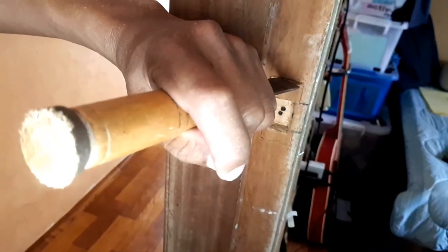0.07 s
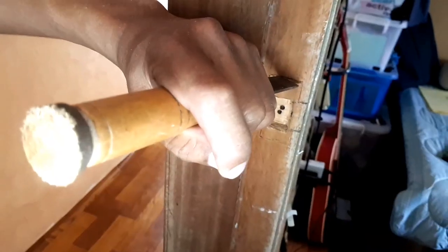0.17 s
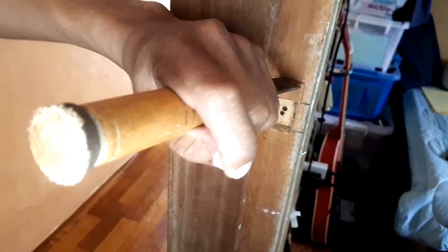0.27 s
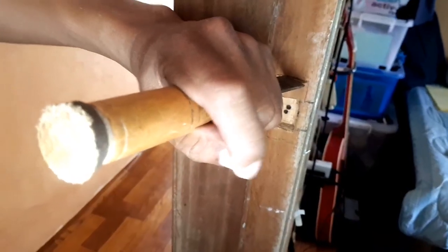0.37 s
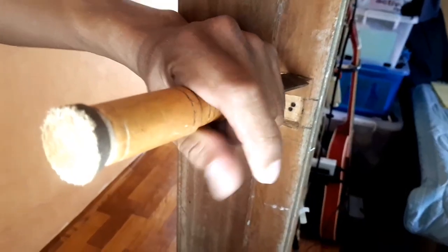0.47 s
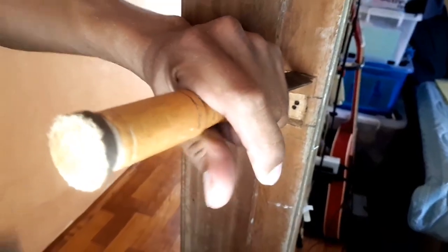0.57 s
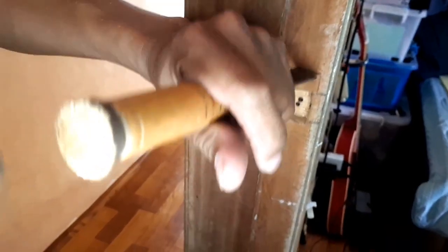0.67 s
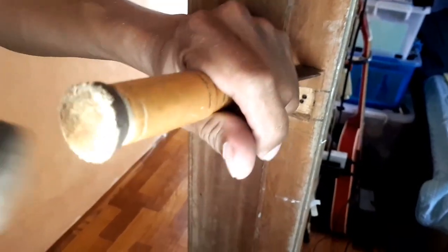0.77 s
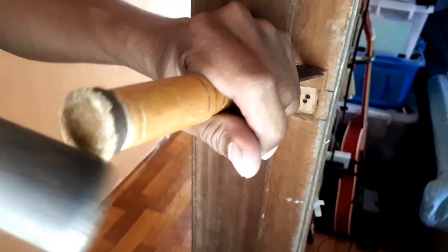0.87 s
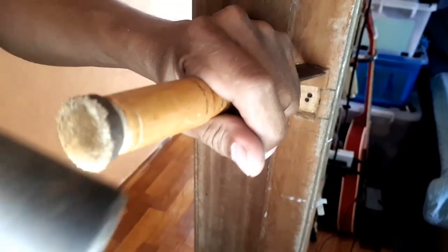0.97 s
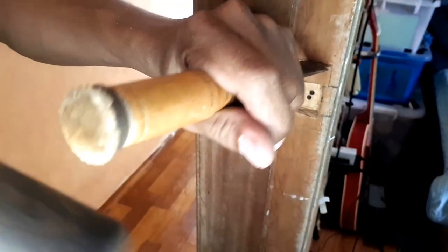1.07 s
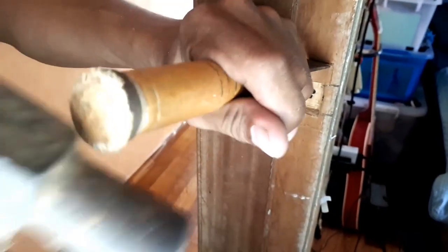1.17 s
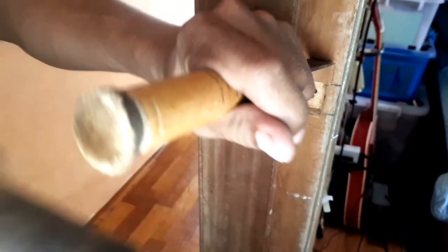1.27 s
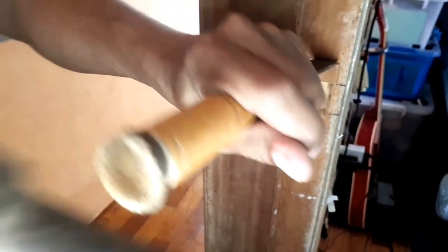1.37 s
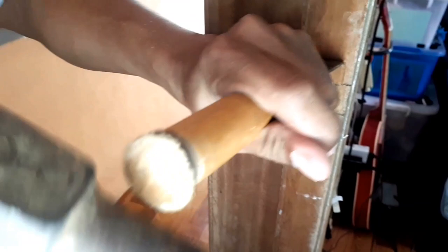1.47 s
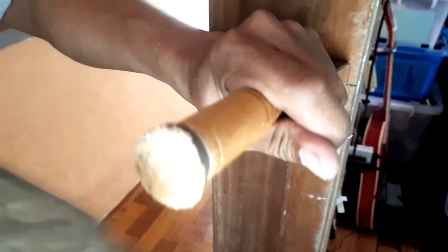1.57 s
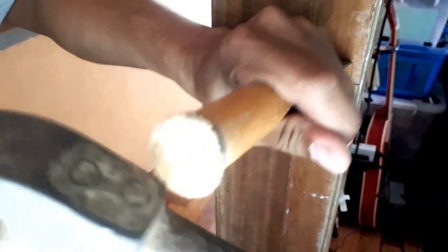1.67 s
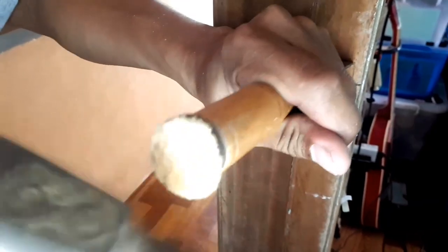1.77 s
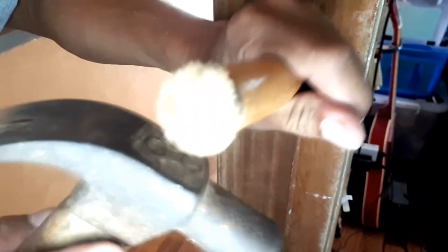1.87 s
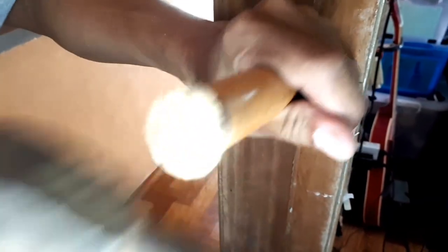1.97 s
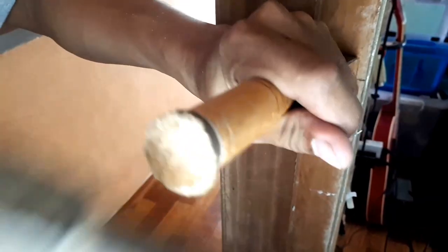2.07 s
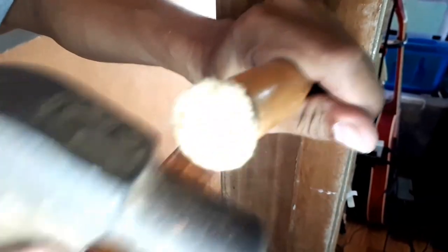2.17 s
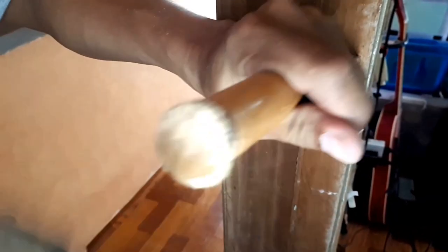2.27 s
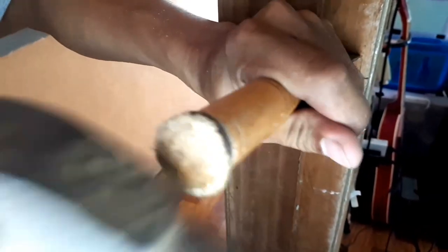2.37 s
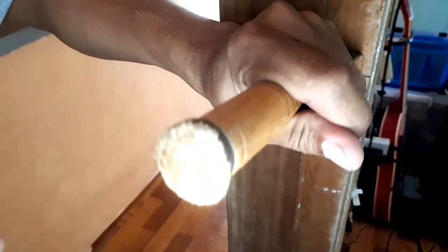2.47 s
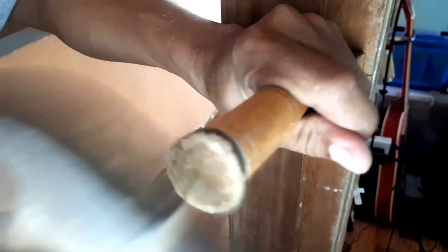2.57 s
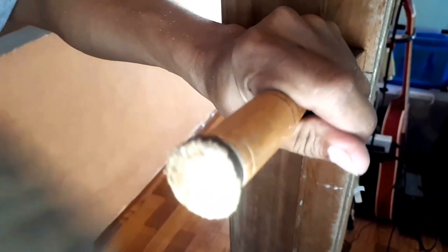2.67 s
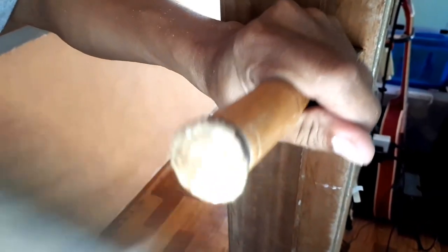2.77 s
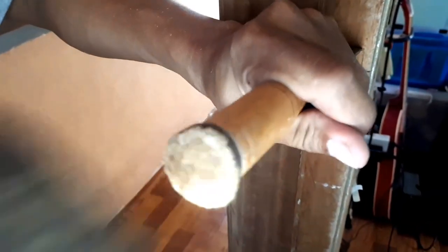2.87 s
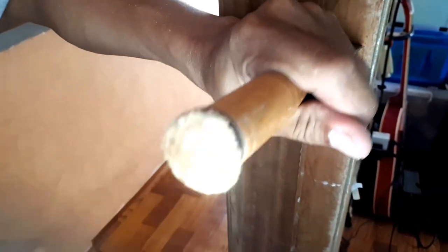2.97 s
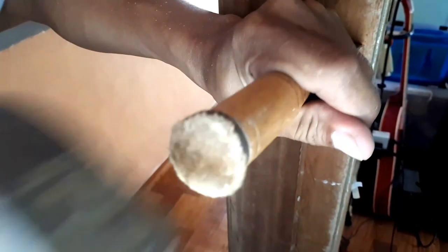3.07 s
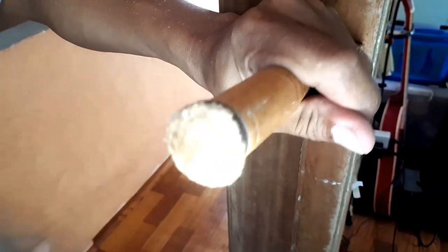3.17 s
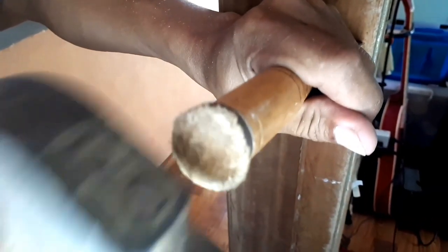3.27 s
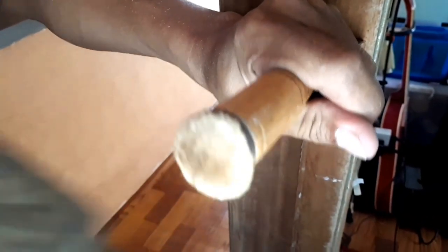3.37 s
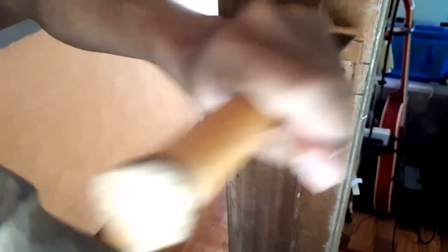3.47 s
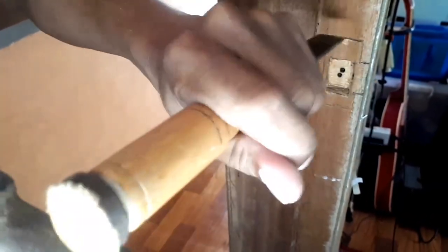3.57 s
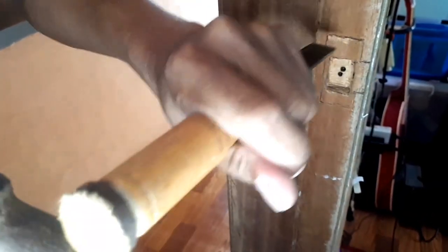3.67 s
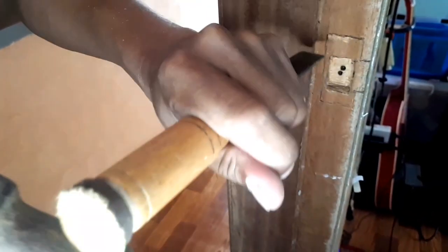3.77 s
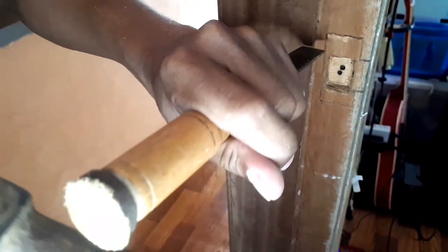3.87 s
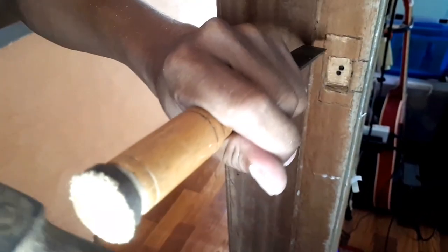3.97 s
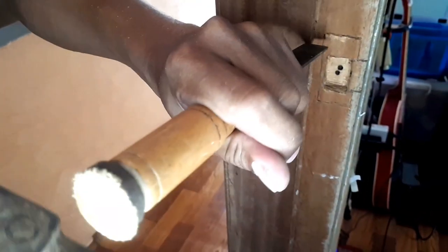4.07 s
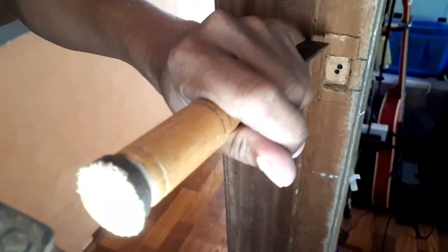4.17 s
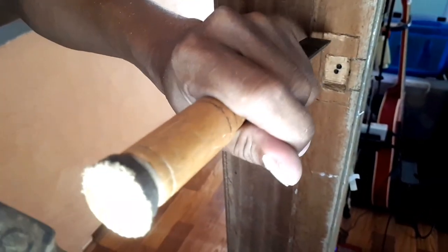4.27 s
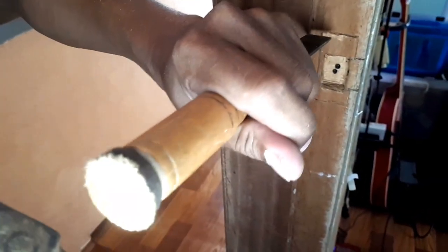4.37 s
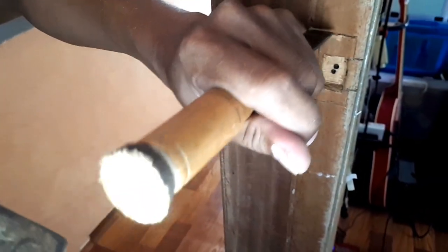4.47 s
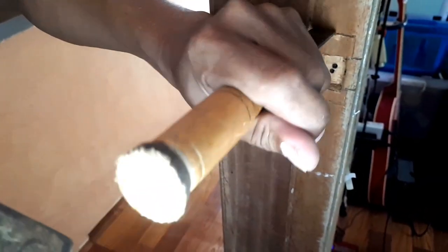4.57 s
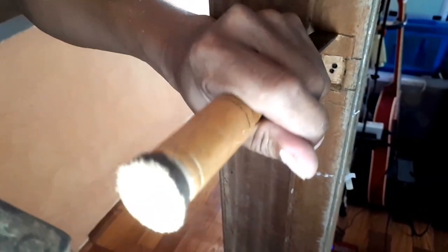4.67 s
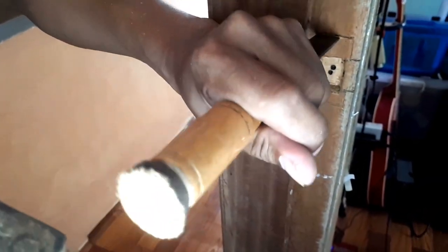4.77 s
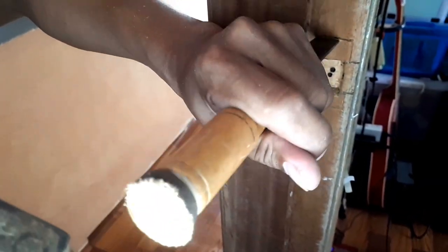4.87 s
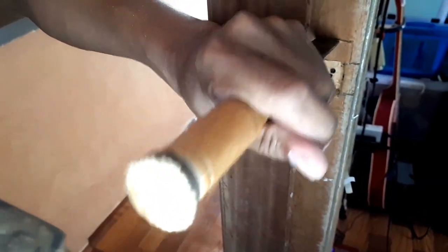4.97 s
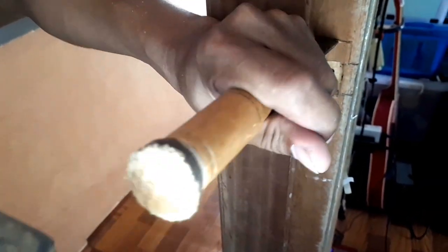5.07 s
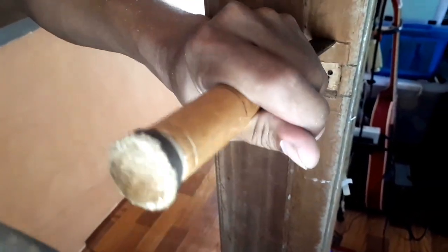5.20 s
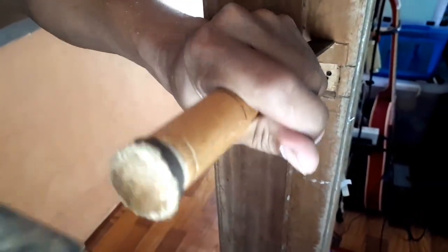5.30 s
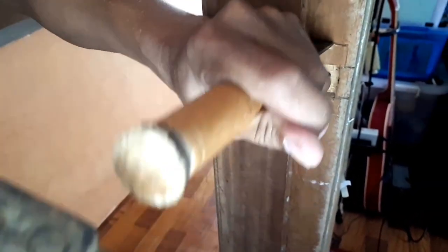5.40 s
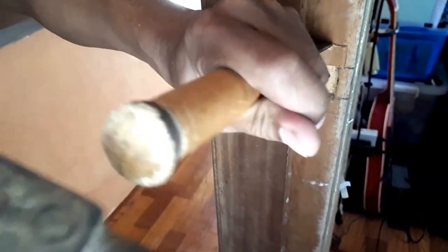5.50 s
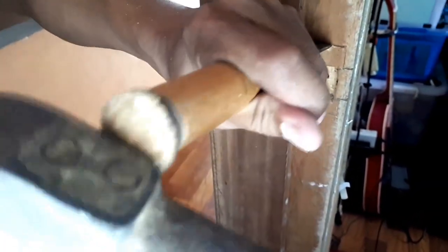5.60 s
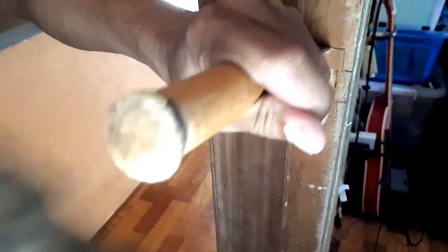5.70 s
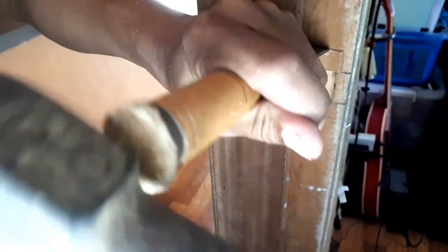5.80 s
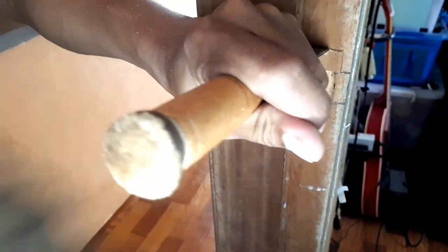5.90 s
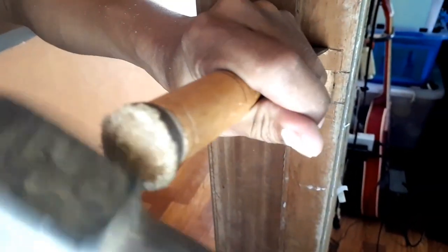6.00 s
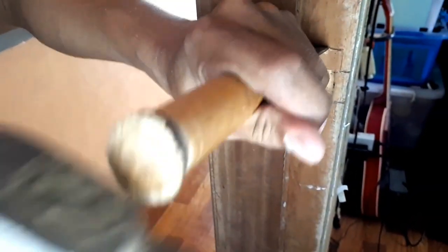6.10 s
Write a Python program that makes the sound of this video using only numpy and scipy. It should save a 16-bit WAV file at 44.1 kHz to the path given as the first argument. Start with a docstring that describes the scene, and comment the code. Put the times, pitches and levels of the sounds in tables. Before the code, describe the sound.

Close to a stereo microphone in a small room, a steel hammer hits a wood-handled chisel set in a door jamb. Nine blows begin dull and boomy, then turn hard and bright. A pause of over two seconds holds only slight rubs and touches while the faint engine and traffic background sinks and returns. Three final blows go from thuddy to sharp.

```python
"""Engines drone and tyres hiss outside; then a steel hammer drives a wood-handled chisel into a door jamb,
close to the microphone in a small room. Dull blows sink the edge in and boom the jamb; hard ones land on
seated wood and crack brightly. In the pause the background sinks away and returns, and the tools rub and
touch the wood; three more blows end it. Each blow is a contact pulse convolved with the response of chisel,
jamb and room; engines are sums of harmonics, traffic and rubs are shaped noise."""
import sys
import numpy as np
from scipy import signal
from scipy.fft import rfft, irfft
from scipy.io import wavfile
from scipy.ndimage import uniform_filter1d, minimum_filter1d

SR = 44100
rng = np.random.default_rng(int(sys.argv[2]) if len(sys.argv) > 2 else 0)


def file_out(sig):
    """Save sig as 16-bit WAV at sys.argv[1]."""
    # one column per channel
    cols = np.atleast_2d(sig).T
    # limit, then scale
    lim = np.clip(cols, -1, 1)
    pcm = np.round(lim * 32767).astype(np.int16)
    wavfile.write(sys.argv[1], SR, pcm)


N = 270774

# spectrum of a faint even hiss, also the raw noise for rubs and whines: frequency_hz, level_db
HISS_SPECTRUM = [(100, -3.5), (3000, -2.5), (7700, -0.5), (8300, -4), (15500, -1.5)]


def amp(db):
    """Decibels to amplitude ratio: 20 dB is a factor of ten."""
    return 10 ** (np.asarray(db) / 20)


def unit(x):
    """Normalises a signal to a root-mean-square value of 1."""
    return x / np.sqrt(np.mean(x ** 2) + 1e-20)


def read(points, hz):
    """Interpolates a spectrum by straight lines on a log-frequency axis."""
    f, value = np.transpose(points)
    return np.interp(np.log(hz + 1), np.log(f + 1), value)


def add(mix, s, sound):
    """Superposition: mixes a sound in at time s, cut off at the end of the mix."""
    part = mix[:, max(round(s * SR), 0):][:, :sound.shape[-1]]
    part += sound[..., :part.shape[1]]


def click(points, size=4096):
    """Minimum phase: the most compact causal pulse with the given spectrum."""
    hz = abs(np.fft.fftfreq(size, 1 / SR))
    log_gain = np.log(amp(read(points, hz)))
    # the Hilbert transform of the log gain gives the phase
    spectrum = np.exp(np.conj(signal.hilbert(log_gain)))
    return np.fft.ifft(spectrum).real[:size // 2]


def noise(points, size):
    """Interaural coherence: coloured noise, alike at both ears in the bass, unrelated in the treble."""
    # likeness of the two ears: frequency_hz, coherence (0 to 1)
    coherence = [(50, 1), (300, 0.87), (600, .7), (1100, 0.01), (2200, .05), (8000, 0)]
    hz = np.fft.rfftfreq(size, 1 / SR)
    left, other = rfft(rng.standard_normal((2, size)))
    same = read(coherence, hz)
    right = same * left + np.sqrt(1 - same ** 2) * other
    return irfft(np.array([left, right]) * amp(read(points, hz)), size)


def wander(rate_hz):
    """Low-passed noise: a slow random fluctuation with a root-mean-square value of 1."""
    hz = np.fft.rfftfreq(N, 1 / SR)
    spectrum = rfft(rng.standard_normal(N)) / (1 + (hz / rate_hz) ** 4)
    return unit(irfft(spectrum, N))


def low_cut(x, corner_hz):
    """Second-order high-pass: as with a small source, little deep bass remains."""
    return signal.sosfilt(signal.butter(2, corner_hz, "high", fs=SR, output="sos"), x)


def swells(rows):
    """Band-limited noise: each band swells and fades once along half a sine."""
    out = np.zeros((2, N))
    for start, end, hz, width, db in rows:
        swell = np.sin(np.linspace(0, np.pi, round((end - start) * SR)))
        edges_hz = [max(hz - width / 2, 20), hz + width / 2]
        band = signal.butter(2, edges_hz, "band", fs=SR, output="sos")
        sound = signal.sosfilt(band, noise(HISS_SPECTRUM, len(swell))) * swell
        add(out, start, amp(db) * unit(sound))
    return out


def lull_db(late_s=0):
    """Level envelope in decibels: the background sinks steadily, stays low, then comes back quickly."""
    start_s, fall_s, end_s, rise_s, depth_db = 2.7, 0.81, 4.38, 0.25, -16.5
    t = np.arange(N) / SR
    sinking = (t - start_s - late_s) / fall_s
    returning = 1 - (t - end_s) / rise_s
    return depth_db * np.clip(np.minimum(sinking, returning), 0, 1)


def street(tyre_lull=1.15, tyre_late_s=0.45, hiss_lull=0.76):
    """Spreading loss: tyre noise falls with distance from each pass, over steady rumble and a faint hiss."""
    # traffic rumble through the walls: frequency_hz, level_db
    rumble_spectrum = [(25, -18), (60, -19.5), (90, -10.5), (150, -3), (250, -6.5), (400, -14.5),
                       (800, -21), (1300, -33), (2500, -49.5), (6000, -71)]
    # hiss of tyres: frequency_hz, level_db
    tyre_spectrum = [(200, -28.5), (800, 1), (1500, -5), (2800, -10), (4200, -21), (7500, -25.5),
                     (9000, -40), (16000, -49)]
    # vehicles passing outside: nearest_s, tyre_level_db, time to cover its own distance from the room span_s
    passes = [(0.218, -50.5, 0.28), (2.0, -55, 0.51), (5.72, -53.5, 0.083)]
    t = np.arange(N) / SR
    swell_db = .5 * wander(10)
    # amplitude is inverse to distance; the powers of the vehicles add
    nearness = np.sqrt(sum(amp(db) ** 2 / (1 + ((t - s) / span_s) ** 2) for s, db, span_s in passes))
    rumble = amp(-44.5 + lull_db() + swell_db) * unit(noise(rumble_spectrum, N))
    tyre_gain = nearness * amp(tyre_lull * lull_db(tyre_late_s) + swell_db)
    tyres = tyre_gain * unit(noise(tyre_spectrum, N))
    hiss = amp(-69 + hiss_lull * lull_db()) * unit(noise(HISS_SPECTRUM, N))
    return rumble + tyres + hiss


def engines(waver=.006, flutter_db=-0.3, throb=0.31, lull_share=.9, count=5):
    """Harmonics and resonance: engines idle, then speed up, their low orders swelling at the room modes."""
    # engines outside: start_s, end_s, firing rate at idle_hz, speed-up from pull_s, gain in hz_per_s, level_db
    engine_runs = [(-.3, 2.66, 50.73, 1.2, 4.1, -2), (3.6, 5.6, 35.58, 4.2, 3.7, 0.5)]
    # low resonances of the room, which lift each order passing through: centre_hz, width_hz, peak_db
    room_modes = [(56.9, 5.7, -40), (102.85, 4.2, -43), (153, 30, -46), (209, 22, -59), (256, 15, -56.5)]
    fade_db_per_s = 121
    t, out = np.arange(N) / SR, np.zeros(N)
    for start, end, idle_hz, pull_s, hz_per_s, db in engine_runs:
        hz = idle_hz + hz_per_s * np.maximum(t - pull_s, 0)
        turn = 2 * np.pi * np.cumsum(hz * (1 + waver * wander(6))) / SR
        outside_s = abs(t - np.clip(t, start, end))
        level = amp(db - fade_db_per_s * outside_s + flutter_db * wander(9))
        for k in range(1, count + 1):
            lift = sum(amp(peak_db) / (1 + (2 * (k * hz - centre) / width) ** 2)
                       for centre, width, peak_db in room_modes)
            throbbing = 1 + throb * k / count * wander(4.7)  # higher orders throb more
            out += level * lift * throbbing * np.sin(k * turn)
    return np.sqrt(2) * amp(lull_share * lull_db()) * out


def whines():
    """Narrow-band noise: thin far whines, each heard as a blurred pitch."""
    # start_s, end_s, pitch_hz, width_hz, level_db
    whine_bands = [(.92, 1.35, 1680, 280, -61), (1.5, 1.75, 2330, 260, -66), (3.8, 4.5, 1730, 90, -86),
                   (4.55, 5.9, 2270, 240, -77), (5.28, 5.43, 2090, 90, -66), (5.0, 5.65, 5190, 200, -81),
                   (5.35, 5.95, 5190, 180, -73), (5.69, 5.81, 5180, 110, -68)]
    return swells(whine_bands)


def rubs():
    """Sliding friction as broad-band noise: the hand and the blade slide as the chisel is reset."""
    # start_s, end_s, centre_hz, width_hz, level_db
    rub_bands = [(.895, .97, 188, 60.19, -41), (.895, 1.05, 380, 590, -44), (3.42, 3.68, 1830, 1950, -65.5),
                 (3.81, 3.92, 10000, 9030, -74.5)]
    return swells(rub_bands)


def splinters():
    """Exponential decay: short dry noise bursts of wood fibre that ticks as the edge shifts."""
    # start_s, level_db, decay time constant length_s
    ticks = [(1.530, -58.5, 0.0045), (2.195, -41.5, 0.0072), (2.202, -43, 0.0091), (3.583, -66, 0.01),
             (4.828, -54.5, 0.0035)]
    # frequency_hz, level_db
    tick_spectrum = [(500, -46), (3500, 3), (5000, -7), (7700, -0.5), (9500, -3), (13000, 2.5),
                     (16000, -5.5)]
    t, out = np.arange(SR // 2) / SR, np.zeros((2, N))
    for s, db, length in ticks:
        add(out, s, amp(db) * np.exp(-t / length) * unit(noise(tick_spectrum, len(t))))
    return out


def room(t, build_s=0.0091):
    """Reverberation: diffuse sound builds up and dies exponentially, each band at its own rate."""
    # reverberant spectrum: frequency_hz, level_db
    room_spectrum = [(50, -21), (120, -14.5), (200, 20), (330, 22), (560, 22.5), (900, 22), (1400, 22),
                     (2200, 14), (3200, 3.5), (4400, -5.5), (7300, -8.5), (9000, -20.5), (11000, -15),
                     (16000, -24)]
    # reverberation time, a fall of 60 dB: frequency_hz, t60_s
    room_decay = [(150, .9), (400, 0.34), (1000, 0.29), (2700, 0.28), (7000, .22), (14000, .29)]
    hz, s, z = signal.stft(noise(room_spectrum, len(t)), SR, nperseg=512)
    t60 = read(room_decay, hz)[:, None]
    # the root gives every band the same energy whatever its decay
    z = z * amp(-60 * s / t60) * np.sqrt(2 * np.log(1000) / (t60 * SR))
    tail = signal.istft(z, SR, nperseg=512)[1][:, :len(t)]
    return tail * (1 - np.exp(-t / build_s))


def ring(t, modes, scatter_hz=620, rise_s=0.002):
    """Modal decay: damped sines, nearly in step when low, more scattered in phase when higher."""
    out = np.zeros((2, len(t)))
    for hz, db, t60, pan_db in modes:
        spread = min(hz / scatter_hz, 2) ** 3
        # one shift shared by both ears, a smaller one for each ear
        phase = spread * (rng.standard_normal() + 0.25 * rng.standard_normal((2, 1)))
        level_db = db - 60 * t / t60 + np.array([[pan_db], [-pan_db]]) / 2
        out += amp(level_db) * np.sin(2 * np.pi * hz * t + phase)
    return out * (1 - np.exp(-t / rise_s))


def snap(size, lead_s=.0007, lead_db=-5):
    """Early reflections: the blow heard directly, then off door, wall and floor."""
    # first snap straight from the chisel: frequency_hz, level_db
    snap_spectrum = [(40, -13), (130, 2), (260, 25), (480, 13.5), (650, 12.5), (950, 27.5), (1400, 20.5),
                     (2200, 3.5), (3200, -15), (4500, -27.5), (8500, -35), (11000, -28), (16000, -29.5)]
    # delay at the left ear left_s, at the right ear right_s, level_db
    echoes = [(.0038, 0.0036, -2.5), (.0089, .0085, -13.5), (0.0204, .0189, -10.5)]
    out, pulse = np.zeros((2, size)), click(snap_spectrum)
    add(out, 0, -amp(lead_db) * pulse)  # the wood first gives way from the microphone
    add(out, lead_s, pulse)
    for left_s, right_s, db in echoes:
        add(out[:1], lead_s + left_s, amp(db) * pulse)
        add(out[1:], lead_s + right_s, amp(db) * pulse)
    return out


def knock(t, contact_s=0.00025):
    """Damped modes: the handle rings for a few cycles, set going by the hammer and damped by the hand."""
    # handle modes: frequency_hz, t60_s, left_db, right_db
    handle_modes = [(886, 0.013, -8, -9), (1345, .03, -19, -7.5), (1760, 0.038, -25, -24.5),
                    (2170, 0.051, -19, -19), (2960, 0.037, -30.5, -32), (3700, .025, -35, -35)]
    modes = sum(amp(np.array([[left], [right]]) - 60 * t / t60) * np.sin(2 * np.pi * hz * t)
                for hz, t60, left, right in handle_modes)
    return -modes * (1 - np.exp(-(t / contact_s) ** 2))


def crunch(t, level_db=-9, rise_s=.0008, length_s=0.0054):
    """Fracture noise: a few milliseconds of dense cracking as the edge goes in."""
    # edge crushing wood fibres: frequency_hz, level_db
    crunch_spectrum = [(300, -27), (700, -0.5), (1200, 6.5), (2300, -2.5), (3300, -14.5), (4500, -27),
                       (7500, -31.5), (9000, -41.5), (11000, -33.5), (16000, -43.5)]
    envelope = (1 - np.exp(-t / rise_s)) * np.exp(-t / length_s)
    return amp(level_db) * envelope * unit(noise(crunch_spectrum, len(t)))


def force(level_db, thud_db, knock_db, bite_db, crack_db):
    """Contact time: soft wood lengthens and dulls the pulse, seated wood makes it short and bright."""
    spectrum = [(70, 0.004), (170, thud_db), (360, thud_db), (650, 0), (1080, 0.013),
                (1280, knock_db), (1750, bite_db), (3300, bite_db), (6500, crack_db)]  # (Hz, dB)
    return amp(level_db) * click(spectrum)[None]


def contacts():
    """Contact stiffness: the more the wood gives, the more thud and the less bite a blow has."""
    # blows: start_s, force_db, give of the wood (0 seated to 1 soft), ringing of jamb, chisel and room ringing_db
    blow_rows = [(1.2511, -4.5, 0.94, -3), (1.699, -4.5, 0.58, 5), (1.8931, -1, 0.73, -4.5),
                 (2.1915, -6, 0.84, -4), (2.4451, -0.5, 0.57, 0), (2.665, 0, 0.2, 3), (2.894, 0, 0.15, -2),
                 (3.109, -1.5, 0.023, -1), (3.3197, -1.5, .02, -2), (5.6484, -0.5, 0.7, -3),
                 (5.8708, 0.5, 0.22, 2.5), (6.0737, -1.5, .02, 2)]
    # light touches of the tools on the wood: start_s, force_db, ringing_db
    touch_rows = [(.901, -41, -8.5), (3.561, -63, -10), (4.1, -56.5, -16), (4.643, -33, -11.5)]
    # colours of a seated blow, a soft blow and a touch: thud_db, knock_db, bite_db, crack_db
    seated, soft = np.array((0.5, -.5, 4.5, -1)), np.array((11, -22, -18.5, -7))
    touch_colour = (25.5, -30, -21.5, -6)
    powers = np.array([1, 3.4, 1, 1])  # the knock dulls only in really soft wood
    rows = []
    for s, db, give, ringing_db in blow_rows:
        colour = seated + (soft - seated) * np.clip(give, 0, 1) ** powers
        rows.append((s, db, colour, ringing_db))
    for s, db, ringing_db in touch_rows:
        rows.append((s, db, touch_colour, ringing_db))
    return rows


def chisel(snap_db=-1, chisel_db=1.5, room_db=3.0, fresh=0.55):
    """Linear response: every contact pulse drives the same wood, with fresh crunch and partly fresh room."""
    # boom of jamb and door frame: frequency_hz, level_db, t60_s, left minus right pan_db
    jamb_modes = [(148.4, -37, 0.55, 3), (191.8, -30, 0.73, -3), (216.6, -20.5, 0.33, -2.5),
                  (232.7, -24.5, 0.37, 0.5), (253.1, -13, 0.23, -1), (269.3, -33, 0.79, -1),
                  (316, -27.5, 0.3, -7), (324.4, -24, 0.2, -2.5), (336, -33, 0.12, 2),
                  (385.4, -25.5, .23, 4), (434, -26, 0.29, 2.5), (538, -36, 0.12, -2),
                  (593, -34.5, .25, 1.5), (696, -37.5, 0.62, -1)]
    # ring of the chisel seated in the wood: frequency_hz, level_db, t60_s, left minus right pan_db
    chisel_modes = [(789.3, -29.5, 0.3, 2), (835.1, -31.5, 0.3, 3), (879.5, -27.5, 0.3, 0),
                    (931.3, -31.0, 0.3, 5), (994.6, -34.0, 0.3, 5), (1023.5, -27.5, 0.3, 0),
                    (1045.7, -30.5, 0.3, -5), (1191.1, -30.5, 0.3, -6), (1314.2, -27.5, 0.3, 0),
                    (1341.1, -33.0, 0.3, -2), (1440.7, -33.6, 0.26, 6), (1525.5, -37.8, 0.26, 12),
                    (1754.3, -31.8, 0.26, -12), (1835.7, -38.6, 0.26, 1), (1962.9, -40.6, 0.26, 1),
                    (2088.7, -34.6, 0.26, -3), (2176.9, -34.0, 0.26, 2), (2292.6, -47.7, 0.26, -7),
                    (2425.8, -37.0, 0.26, -4), (2872.0, -45.0, 0.26, -2), (3014.6, -46.5, 0.26, -5),
                    (3320.8, -50.4, 0.26, -1)]
    t, out = np.arange(SR) / SR, np.zeros((2, N))
    direct = low_cut(amp(snap_db) * snap(len(t)) + knock(t), corner_hz=127)
    shared_tail = room(t)
    boom = low_cut(ring(t, jamb_modes), corner_hz=104)
    wood = boom + amp(chisel_db) * ring(t, chisel_modes)
    for s, force_db, colour, ringing_db in contacts():
        # the fresh share is a share of energy
        tail = amp(room_db) * (np.sqrt(1 - fresh) * shared_tail + np.sqrt(fresh) * room(t))
        response = direct + crunch(t) + amp(ringing_db) * (wood + tail)
        pulse = force(force_db, *colour)
        add(out, s - .001, signal.fftconvolve(response, pulse, axes=1))  # begins 1 ms early
    return out


def facing(x):
    """Directivity: two microphones face different ways, so their balance varies with frequency."""
    # left minus right level: frequency_hz, balance_db
    balance = [(200, 2), (900, 1), (2000, -1), (4500, -2.5), (7500, 3), (15000, 6)]
    pan_db = read(balance, np.fft.rfftfreq(2 * N, 1 / SR))
    return irfft(rfft(x, 2 * N) * amp(np.array([pan_db, -pan_db]) / 2))[:, :N]


def scene():
    """Superposition of the background outside and the work at the jamb."""
    background = street() + engines() + whines()
    work = facing(chisel() + splinters()) + rubs()
    return background + work


def record(dry):
    """Peak limiting by a fast gain shared by both channels, then band-limiting, low and high."""
    size = round(.002 * SR)
    gain = np.minimum(1, .96 / (abs(dry).max(0) + 1e-9))
    smooth_gain = uniform_filter1d(minimum_filter1d(gain, size), size)
    limited = low_cut(dry * smooth_gain, corner_hz=30)
    high_cut = signal.firwin(255, 16000, window=("kaiser", 8), fs=SR)  # upper edge in Hz
    return signal.oaconvolve(limited, high_cut[None], "same")


dry = scene()
out = record(dry)
file_out(out)
```